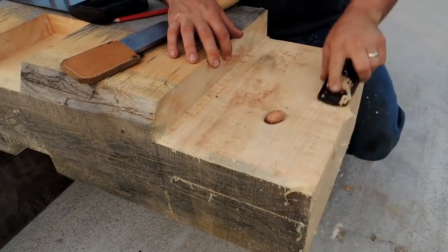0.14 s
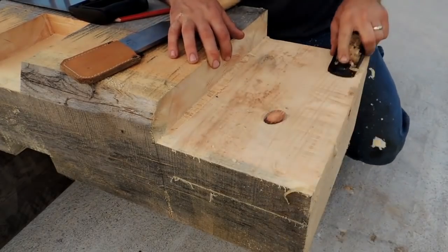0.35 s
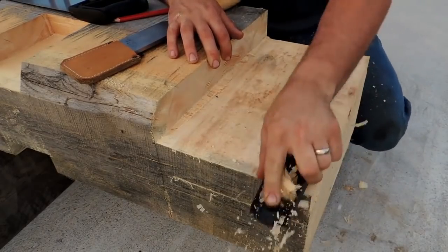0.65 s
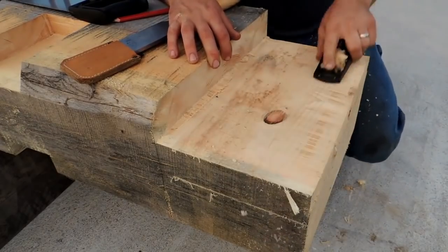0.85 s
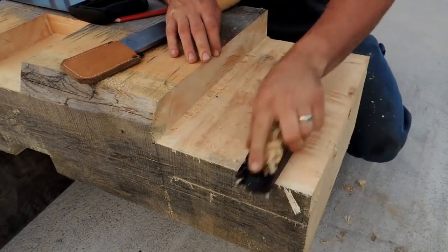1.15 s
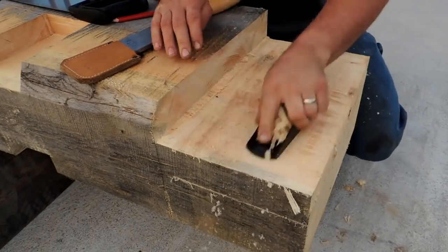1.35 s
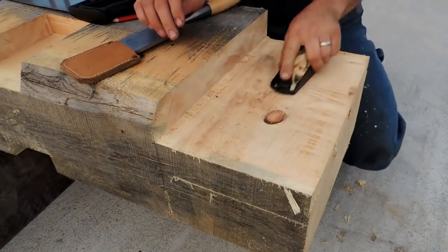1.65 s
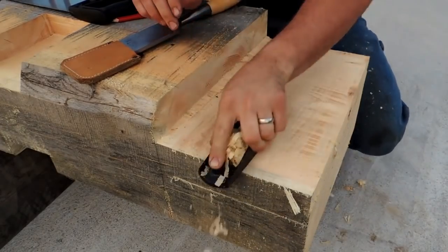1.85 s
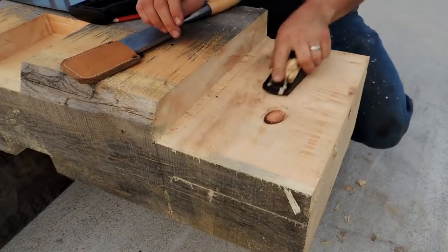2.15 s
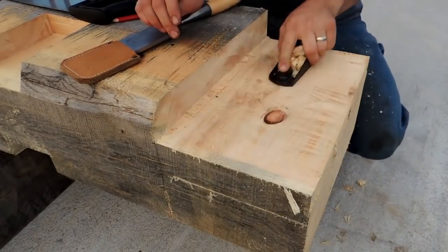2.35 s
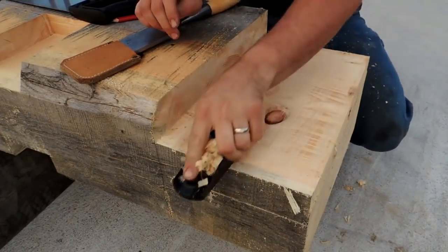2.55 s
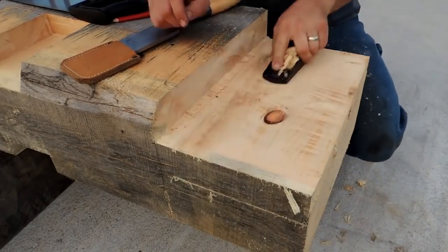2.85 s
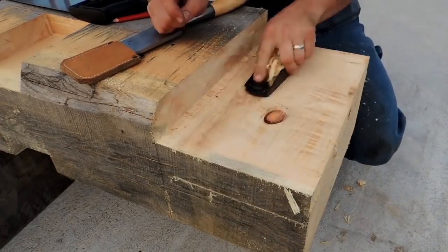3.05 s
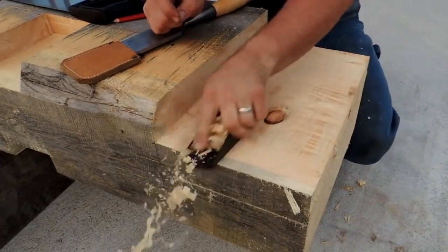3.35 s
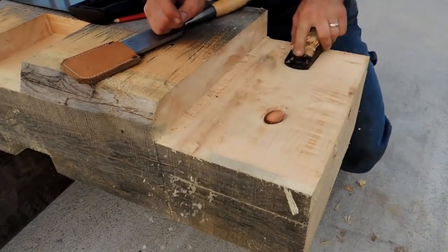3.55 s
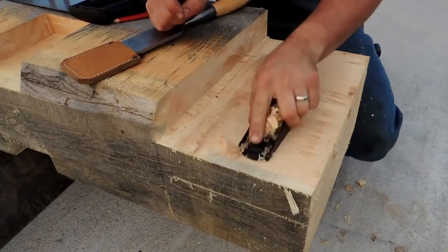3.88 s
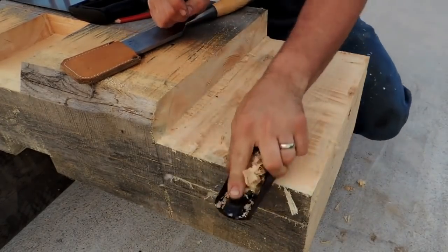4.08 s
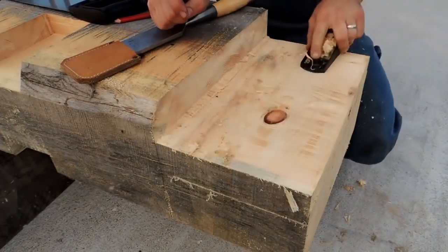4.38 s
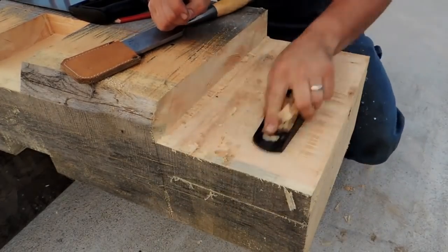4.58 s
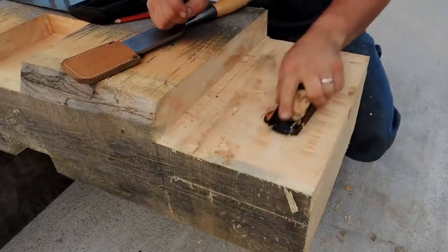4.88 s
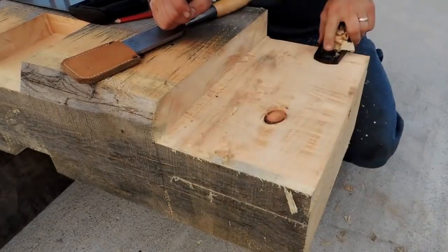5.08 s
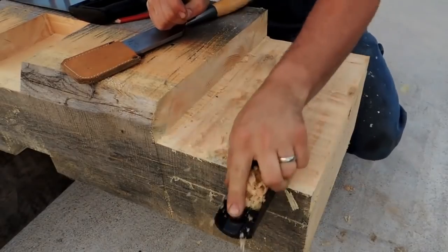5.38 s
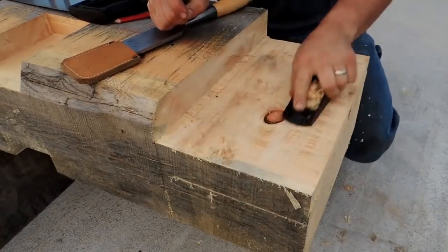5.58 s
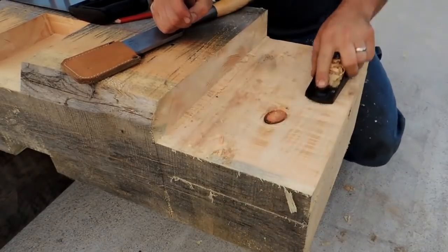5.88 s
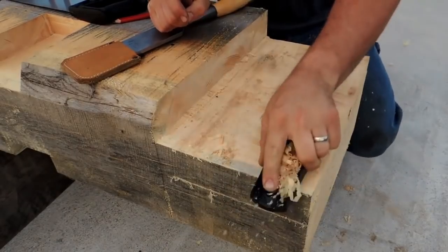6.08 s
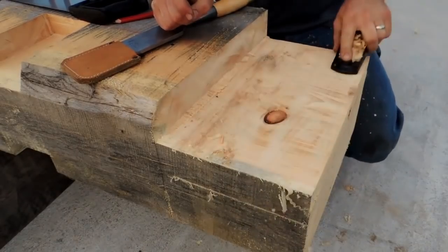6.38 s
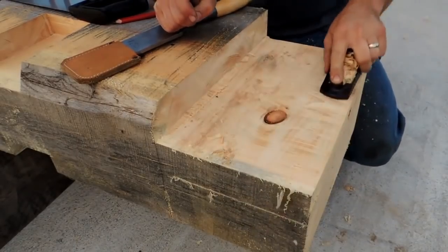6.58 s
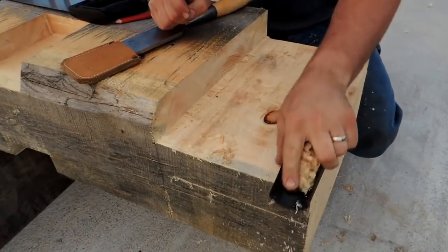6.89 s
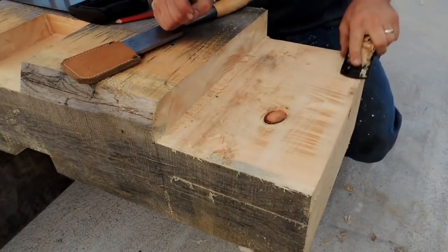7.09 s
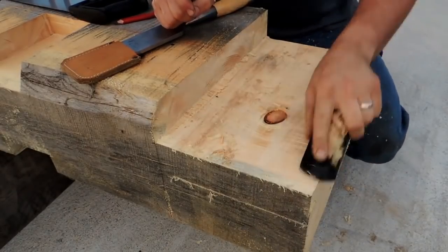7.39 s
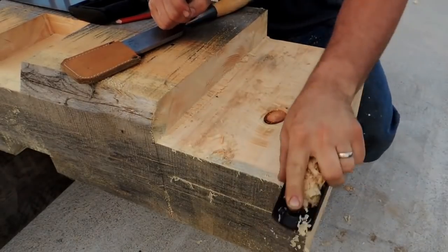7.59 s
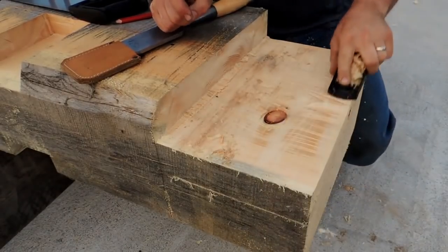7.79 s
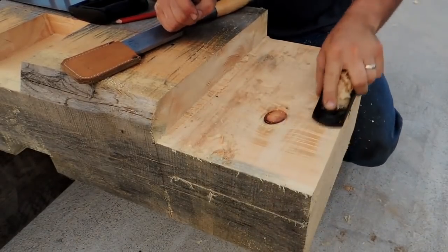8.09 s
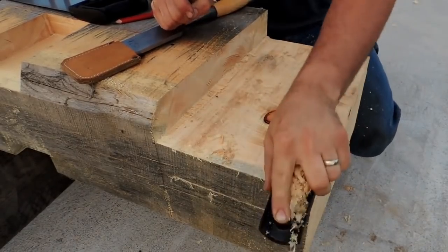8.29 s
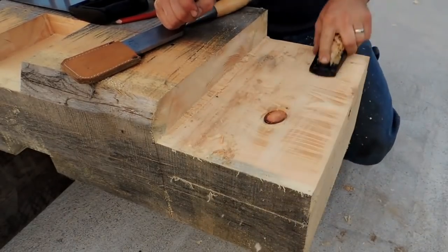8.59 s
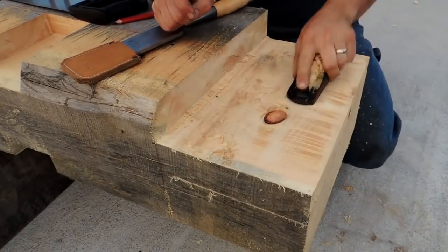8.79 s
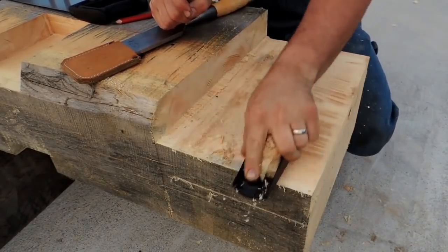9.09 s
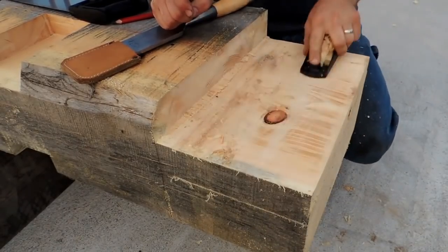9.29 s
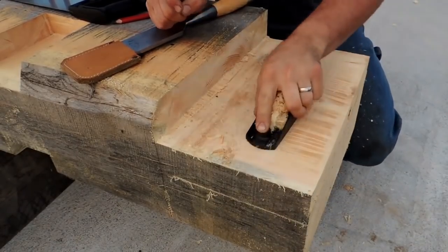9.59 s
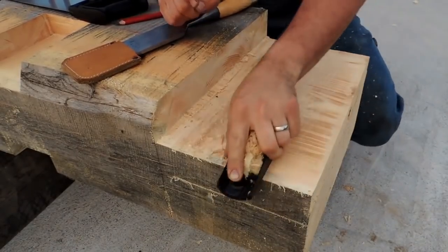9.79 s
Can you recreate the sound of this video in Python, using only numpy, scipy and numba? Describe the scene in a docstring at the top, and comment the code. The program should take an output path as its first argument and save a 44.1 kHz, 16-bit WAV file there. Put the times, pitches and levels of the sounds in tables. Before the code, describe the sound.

A block plane shaves a large timber for about ten seconds, heard close in a quiet yard with only a faint echo. It is pushed and dragged back roughly every 0.7 seconds. Pushes are dry, hollow rasps with hissing shavings, often ending in a short zip off the edge; returns are duller rubs. The strokes start firm, turn lighter from about 2 to 5 seconds, then grow stronger, with a sharp scrape at 6.5 and firm strokes until 9, before a softer last push. The timber rocks with low thumps near 1.5, 2.2 and 3.1 seconds, in a cluster from 4.5 to 5.1, and again from 7.6 to 8.4. The plane lands with dull knocks around 3.5, 5.8 and 8.7 seconds. Small chip clicks and snags are scattered throughout, with tiny high squeaks near 1.9, 4 and 9.7 seconds.

```python
"""Planing a timber outdoors

A block plane shaves the end of a big timber, pushed and dragged back in quick strokes. Friction and
tearing fibres excite the resonances of the wood and of the hollow under the hand. The sole zips over
the end edge, the timber rocks on its support with low thumps, and the yard answers faintly."""
import sys
import numpy as np
from scipy import signal
from scipy.fft import rfft, irfft, next_fast_len
from scipy.io import wavfile
from scipy.ndimage import uniform_filter1d, map_coordinates
from numba import njit

SR = 44100
rng = np.random.default_rng(int(sys.argv[2]) if len(sys.argv) > 2 else 0)


def unload_audio(sound):
    """Save the sound as a 16-bit wav file, at the path given as the first command line argument."""
    columns = np.transpose(np.atleast_2d(sound))
    # keep every value between -1 and 1, then stretch to whole-number steps
    steps = np.round(np.clip(columns, -1, 1) * 32767)
    wavfile.write(sys.argv[1], SR, steps.astype(np.int16))


N = 438354

# Forward and return strokes; in every table, levels are relative within a layer:
# (start [s], end [s], run-up [s], slow-down [s], scrape [dB], pressure gained over the stroke [dB],
# hollow [dB], hiss [dB], bias towards tearing [dB], hollow pitch [Hz], edge zip [dB])
PUSH_STROKES = [(-0.1, 0.129, 0.057, 0.008, -28.5, -3.5, -29.5, -42, 2, 657, -46.5),
                (0.466, 0.746, 0.055, 0.0034, -28.5, 2.5, -32.5, -42.5, -0.5, 698, -19),
                (1.128, 1.372, 0.054, 0.002, -34, -17.5, -34.5, -41.5, 2.5, 700, -22.5),
                (1.764, 2.052, 0.031, 0.021, -44, 2.5, -46.5, -55.0, 4, 716, -47.5),
                (2.465, 2.73, 0.033, 0.01, -42.5, 11, -43, -52.5, 1.5, 550, -48),
                (3.146, 3.372, 0.063, 0.0074, -38, 4.5, -36.5, -50.5, -19, 590, -44.5),
                (3.799, 4.198, 0.056, 0.011, -42, 2.0, -41.5, -50.5, 2.5, 630, -28),
                (4.601, 4.852, 0.038, 0.0026, -45.5, -7.5, -42, -51.5, 2.5, 562, -22.5),
                (5.277, 5.536, 0.054, 0.0043, -34, -8.5, -34.5, -43, 2, 656, -22.5),
                (5.954, 6.257, 0.063, 0.023, -31, -5, -33.5, -37, -4, 640, -33.5),
                (6.647, 6.958, 0.12, 0.019, -24.5, -13.5, -29.5, -37, -0.5, 677, -31.5),
                (7.384, 7.639, 0.035, 0.0022, -28.5, -8, -29.5, -45.5, 1, 554, -25.5),
                (8.119, 8.409, 0.084, 0.0088, -22.5, -13, -26, -36.5, -5.5, 590.0, -27.0),
                (8.859, 9.14, 0.032, 0.01, -31.5, -1.0, -31.5, -43.5, 4.5, 540, -22.5),
                (9.559, 9.962, 0.073, 0.006, -44, -4.5, -47, -57.5, 3, 552, -55.0)]
DRAG_STROKES = [(0.19, 0.431, 0.088, 0.08, -30, 4.0, -29.5, -39.5, -7.5, 560, -49.5),
                (0.858, 1.112, 0.004, 0.077, -29.5, -1, -28, -48.5, -0.5, 527, -29.5),
                (1.484, 1.703, 0.092, 0.037, -35, -9.5, -36.5, -49, 0.5, 488, -37.5),
                (2.192, 2.421, 0.082, 0.065, -41, 7, -39.5, -49.5, -9, 456, -60),
                (2.857, 3.111, 0.025, 0.11, -45.5, -9, -45.5, -59, -21, 457, -41.0),
                (3.522, 3.766, 0.0027, 0.061, -46, 1.5, -47.5, -63.5, -25, 448, -60),
                (4.327, 4.597, 0.014, 0.049, -52.5, 8.5, -48.5, -62, 0, 525, -38),
                (4.988, 5.254, 0.01, 0.057, -39, 9, -37, -51.5, 4, 495, -41.5),
                (5.666, 5.934, 0.014, 0.071, -33.5, 10.0, -36, -49, -5, 538, -33),
                (6.332, 6.643, 0.002, 0.027, -47.5, 22, -40, -60, 1, 545, -54),
                (7.07, 7.329, 0.073, 0.074, -32.5, 7, -32.5, -49, -1.5, 482, -43.5),
                (7.797, 8.089, 0.032, 0.038, -30, 0.5, -28, -50, -2, 467, -30.5),
                (8.553, 8.835, 0.078, 0.091, -28.5, -6.0, -30.5, -44, 1, 490.0, -35.5),
                (9.274, 9.526, 0.0022, 0.074, -37, 3.5, -32.5, -52, 5.5, 495, -28)]
# Modes of plane and timber: (frequency [Hz], bandwidth [Hz], level pushed [dB], level dragged [dB])
BODY_MODES = [(837, 32, -9, -1.5), (1170, 42, 4, -7.5), (1462, 41, 3.5, -10), (1640, 71, -18.5, -4.5),
              (1846, 41, -6, 2.5), (2204, 78, -7, 0), (2870, 190, -7.5, -1.5), (3795, 53, -12.5, 1),
              (4020, 37, -7, -7.5)]


def amp(db):
    """Amplitude ratio of a level in decibels."""
    return 10 ** (np.asarray(db) / 20)


def unit(x):
    """Normalisation to rms 1."""
    return x / np.sqrt(np.mean(x ** 2) + 1e-20)


def steady(x):
    """Division by the running rms, which flattens the slow envelope."""
    return x / np.sqrt(np.abs(uniform_filter1d(x ** 2, size=1800)) + 1e-9)


def along(points, hz):
    """Interpolation of (frequency [Hz], value) points on a logarithmic frequency axis."""
    knots_hz, values = np.transpose(points)
    return np.interp(np.log(hz + 1), np.log(knots_hz), values)


def wobble(rate):
    """Slow random modulation: a spline through `rate` Gaussian knots a second."""
    return map_coordinates(rng.standard_normal(int(N * rate / SR) + 4), [np.arange(N) * rate / SR])


def swells(rows):
    """Sum of asymmetric Gaussian pulses, given as (time [s], rise [s], fall [s], height)."""
    t = np.arange(N) / SR
    total = np.zeros(N)
    for s, rise, fall, height in rows:
        near = np.abs(t - s) < 1
        lag = t[near] - s
        total[near] += height * np.exp(-(lag / np.where(lag < 0, rise, fall)) ** 2)
    return total


def filtered(x, response):
    """Zero-phase filtering: the spectrum is multiplied by a frequency response."""
    size = next_fast_len(len(x) + SR // 4)
    return irfft(rfft(x, size) * response(np.fft.rfftfreq(size, 1 / SR)), size)[:len(x)]


def coloured(x, spectrum):
    """Spectral shaping by (frequency [Hz], level [dB]) points, at rms 1."""
    return unit(filtered(x, lambda hz: amp(along(spectrum, hz))))


def add(track, s, sound):
    """Superposition of a sound on the track from time s."""
    part = track[max(round(s * SR), 0):][:len(sound)]
    part += sound[:len(part)]


@njit
def resonate(x, step, damping):
    """A driven, damped oscillator of varying frequency; step is about its radians per sample."""
    out, low, band = np.zeros(len(x)), 0., 0.
    for i in range(len(x)):
        band += step[i] * (x[i] - low - damping[i] * band)
        low += step[i] * band
        out[i] = band
    return out


def outdoor_air():
    """Stationary broadband noise: the faint background of still air."""
    spectrum = [(20, -18), (55, -3), (120, -32.5), (220, -22), (400, -20.5), (1200, -12.5), (3000, -18),
                (8000, -16), (15000, -34)]  # ambient noise: (frequency [Hz], level [dB])
    return amp(-71) * coloured(rng.standard_normal(N), spectrum)


def yard(x, wall_s, late_db):
    """Reverberation: scattered echoes decay exponentially, raised by late_db after the wall's delay."""
    decay_times = [(150, 0.6), (900, 0.26), (5000, 0.3), (15000, 0.44)]  # reverberation of the yard: (frequency [Hz], T60 [s])
    hz, t, noise = signal.stft(rng.standard_normal(SR // 2), SR, nperseg=256)
    fade_db = -60 * t / along(decay_times, hz)[:, None] + late_db * (t > wall_s)
    tail = signal.istft(noise * amp(fade_db), SR, nperseg=256)[1]
    return signal.fftconvolve(x, tail / np.linalg.norm(tail))[:N]


def blows(events, spectrum, t60, attack_s, gain_db):
    """Heavily damped impacts on thick wood; a softer contact has a slower attack."""
    track, t = np.zeros(N), np.arange(SR // 5) / SR
    envelope = amp(-60 * t / t60) * (1 - np.exp(-(t / attack_s) ** 2))
    for s, db in events:
        knock = coloured(rng.standard_normal(len(t)), spectrum) * envelope
        add(track, s, amp(db + gain_db) * knock / np.abs(knock).max())
    return track


def rocking():
    """Free vibration: the timber drops on its support and booms; shifting weight makes it rumble."""
    drops = [(1.46, -12.5, -8), (2.236, -16, -11), (3.096, -21, -15.5), (3.118, -16.5, -13.5),
             (4.533, -11.5, -17), (4.778, -10.5, -22), (4.927, -7.5, -24), (4.947, -8, -18),
             (5.139, -12, -15), (7.633, -18, -11.5), (7.65, -7, -27), (7.848, -13.5, -13),
             (8.395, -13.5, -22.5), (8.672, -36, -2), (9.477, -25, -28)]  # falls onto the support: (time [s], level [dB], thud offset [dB])
    low_modes = [(58.4, 21, 12), (92, 40, -5)]  # the timber's modes: (frequency [Hz], bandwidth [Hz], level [dB])
    thud_spectrum = [(60, 8.5), (150, 8.5), (350, -3.5), (700, -18.5), (1500, -38), (5000, -52)]  # contact with the support: (frequency [Hz], level [dB])
    shifts = [(1.38, 0.14, -49), (3.27, 0.13, -48), (4.07, 0.22, -54), (4.836, 0.35, -44),
              (5.602, 0.097, -42.5), (6.147, 0.17, -41.5), (7.823, 0.19, -39), (8.43, 0.27, -40),
              (8.96, 0.29, -48.5), (9.62, 0.32, -54)]  # the worker's weight shifts: (time [s], half length [s], level [dB])
    boom, t = np.zeros(N), np.arange(SR // 3) / SR
    ring = sum(amp(db) * np.sin(2 * np.pi * hz * t) * np.exp(-np.pi * width * t)
               for hz, width, db in low_modes)
    ring *= 1 - np.exp(-t / 0.0036)
    for s, db, _ in drops:
        add(boom, s, amp(db - 3.0) * ring / np.abs(ring).max())
    contacts = [(s, db + offset_db) for s, db, offset_db in drops]
    thuds = blows(contacts, thud_spectrum, t60=0.069, attack_s=0.0028, gain_db=7)
    sway = amp(-70) + swells([(s, half, half, amp(db)) for s, half, db in shifts])
    rumble_spectrum = [(20, -25.0), (52, 1.0), (100, -9.0), (180, -18), (400, -27), (1500, -96)]
    rumble = coloured(rng.standard_normal(N), rumble_spectrum)
    return boom + thuds + sway * amp(4.3 * wobble(14)) * rumble


def knocks():
    """Impact: the plane is set down on the wood with a dead knock."""
    contacts = [(0.793, -39), (1.426, -31), (3.459, -15.5), (3.477, -24), (3.488, -19), (3.505, -27),
                (4.916, -32), (5.82, -23), (8.717, -16.5)]  # plane meets wood: (time [s], level [dB])
    spectrum = [(60, -22), (200, 11), (420, 12), (750, 8), (1400, -10.5), (2500, -41), (9000, -43)]  # dull knock: (frequency [Hz], level [dB])
    return blows(contacts, spectrum, t60=0.044, attack_s=0.00082, gain_db=-1.5)


def chips():
    """Brittle fracture: chips crack off with short, bright clicks."""
    cracks = [(1.559, -21.5), (3.284, -23), (4.396, -27), (5.14, -19), (5.99, -26.5), (7.067, -35),
              (9.023, -27)]  # chips breaking: (time [s], level [dB])
    spectrum = [(200, -10), (1500, 1), (4000, -4), (15000, -21)]  # click: (frequency [Hz], level [dB])
    return blows(cracks, spectrum, t60=0.029, attack_s=0.00032, gain_db=-3.5)


def fibres(rate, spread_db, share):
    """Shot noise: `rate` fibres snap a second and carry `share` of the power; friction has the rest."""
    snaps = (rng.random(N) < rate / SR) * rng.standard_normal(N)
    snaps *= amp(spread_db * rng.standard_normal(N))
    return np.sqrt(share) * unit(snaps) + np.sqrt(1 - share) * rng.standard_normal(N)


def rasps(events, spectrum, gain_db):
    """Bursts of shot noise: dense snaps swell fast and fade exponentially."""
    envelope, t = np.zeros(N), np.arange(SR // 5) / SR
    for s, db, length in events:
        age = 3 * t / length
        add(envelope, s - .003, amp(db + gain_db) * age * np.exp(1 - age))
    return envelope * coloured(fibres(rate=1900, spread_db=4.5, share=0.42), spectrum)


def catches():
    """Uneven friction: the iron snags, a shaving squeaks in the mouth, the sole judders on the grain."""
    # Bursts of each kind: (time [s], level [dB], length [s])
    snags = [(.597, -12.5, .014), (.998, -22, 0.023), (1.93, -32.5, 0.012), (3.531, -33, 0.016),
             (3.951, -23, 0.026), (3.985, -14, 0.021), (6.498, -20.5, 0.017), (7.102, -23.5, 0.018),
             (8.148, -20, 0.014), (9.645, -27, 0.017)]
    squeaks = [(1.886, -13, 0.022), (3.963, -19.5, 0.017), (9.718, -23, 0.032)]
    judders = [(.46, -27.5, .04), (.95, -23.5, 0.085), (1.56, -28.5, 0.083), (3.73, -34, 0.047),
               (5.74, -33, 0.092), (6.6, -22.5, 0.043), (7.007, -26.5, 0.029), (7.13, -23.5, 0.073),
               (7.93, -23.5, 0.11), (8.59, -28, 0.13)]
    # Their spectra: (frequency [Hz], level [dB])
    tear_spectrum = [(600, -22), (1400, 4), (2300, 6), (3900, -6), (4900, -21), (8000, -23.5), (15000, -30)]
    squeak_spectrum = [(4000, -41), (6500, -25), (7400, -3), (9100, -2), (10300, -6), (12500, -20),
                       (15500, -10.5)]
    judder_spectrum = [(80, -24), (180, -1.5), (330, 6), (700, -39)]
    return (rasps(snags, tear_spectrum, gain_db=-9)
            + rasps(squeaks, squeak_spectrum, gain_db=-11.5)
            + rasps(judders, judder_spectrum, gain_db=-13))


def zips():
    """Edge friction: the sole zips off the timber's end after a push and lands on it to start a drag."""
    # Sole crossing the edge, and landing on it: (frequency [Hz], level [dB])
    zip_spectrum = [(2500, -21.5), (4200, -19), (5000, 1.5), (6200, -4.5), (7500, -6.5), (10000, -38),
                    (16000, -20)]
    landing_spectrum = [(250, -21), (520, -3.5), (900, 2.5), (1300, -7.5), (2400, -12.5), (4000, -32),
                        (9000, -38)]
    lead_s, rise_s, fall_s, crossing_s = 0.016, 0.012, 0.0071, 0.03
    leaving = swells([(end - lead_s, rise_s, fall_s, amp(db - 8.5)) for _, end, *_, db in PUSH_STROKES])
    returning = [(start, db, crossing_s) for start, *_, db in DRAG_STROKES]
    return (leaving * coloured(fibres(rate=2200, spread_db=4.5, share=0.38), zip_spectrum)
            + rasps(returning, zip_spectrum, gain_db=-8.0)
            + rasps(returning, landing_spectrum, gain_db=-3.5))


def patchy(x, depth_db):
    """Position-dependent coupling: random peaks and notches pass as the plane crosses the wood's nodes."""
    frames = signal.stft(x, nperseg=1024)[2]
    patch = np.outer(np.hanning(5), np.hanning(16))
    field = signal.fftconvolve(rng.standard_normal(frames.shape), patch, mode="same")
    return unit(signal.istft(frames * amp(depth_db * unit(field)), nperseg=1024)[1][:N])


def ringing(drive, modes, wander_db, drift):
    """Forced vibration: each mode wanders in level and pitch, as with changing place and grip."""
    total = np.zeros(N)
    for hz, width, db in modes:
        pitch = hz * np.exp(drift * wobble(7.6))
        ring = resonate(drive, 2 * np.sin(np.pi * pitch / SR), width / pitch) * width / pitch
        total += amp(db + wander_db * wobble(12)) * ring
    return total


def hollow(pitch_hz, width_hz, broad_db, highpass_hz):
    """Cavity resonance: the timber's low voice peaks in the hollow between hand and wood."""
    spectrum = [(60, -42), (160, -13), (290, -8), (400, -1), (540, 1.5), (740, -5), (870, -1.5),
                (1100, -8.5), (1500, -31), (3000, -44.5)]  # the timber's low voice: (frequency [Hz], level [dB])
    pitch = np.clip(pitch_hz, 200, 2000)
    drive = patchy(coloured(fibres(rate=900, spread_db=0.0, share=0.31), spectrum), depth_db=4.5)
    voice = unit(resonate(drive, 2 * np.pi * pitch / SR, width_hz / pitch)) + amp(broad_db) * drive
    return steady(signal.lfilter(*signal.butter(3, highpass_hz, "highpass", fs=SR), voice))


def scrape(spectrum, modes, level_db, bite, ring_db):
    """Friction noise drives the modes: a light touch glides dully, a deep bite (0-1) tears brightly."""
    glide_spectrum = [(700, -38), (1000, -8), (1350, 7), (1600, 3), (1900, 5), (2300, 3), (2700, -3.5),
                      (3100, -13.5), (3450, -16), (4150, -14), (4600, -31), (6000, -39.5), (8000, -28)]  # light sliding: (frequency [Hz], level [dB])
    tearing = coloured(fibres(rate=900, spread_db=-1.5, share=0.33), spectrum)
    gliding = coloured(fibres(rate=2500, spread_db=3.5, share=0.46), glide_spectrum)
    broad = patchy(np.sqrt(bite) * tearing + np.sqrt(1 - bite) * gliding, depth_db=4.0)
    return amp(level_db) * steady(broad + amp(ring_db) * ringing(broad, modes, wander_db=4.0, drift=.033))


def motion(strokes, land_s, lift_s, hollow_law, hiss_law, bend_oct, glide_oct):
    """Friction noise grows with pressure and as a power of the sliding speed.
    A law is (exponent of speed, mid-stroke arch [dB], trend from start to end [dB])."""
    # The plane bites harder: (time [s], rise [s], fall [s], scrape [dB], hollow [dB], hiss [dB])
    surges = [(0.228, 0.018, 0.071, 6.5, 7, -4.5), (0.347, 0.018, 0.072, 11.5, 7.0, 10.0),
              (0.552, 0.029, 0.057, 4, 0.5, 4.5), (1.003, 0.017, 0.044, 8, 9, 12),
              (1.241, 0.06, 0.05, 3, -4, 6), (1.354, 0.029, 0.018, 15, 5.5, -1.5),
              (1.56, 0.0021, 0.013, 1.5, 10.5, 10.5), (1.926, 0.058, 0.043, 12.5, 9.5, 6),
              (2.254, 0.011, 0.043, 2.5, 0.5, 7.5), (2.66, 0.042, 0.11, 10, 4.5, 2.5),
              (2.907, 0.028, 0.046, 9, 8, 8), (3.266, 0.032, 0.02, 4, -4, 6),
              (3.339, 0.037, 0.028, 9, -5, -10), (3.552, 0.03, 0.014, 13.5, 11.5, 7),
              (3.976, 0.028, 0.014, 16, 6, 17), (4.159, 0.038, 0.019, 2.5, 8.5, -2.5),
              (4.391, 0.034, 0.015, 13.5, 14.5, 19), (4.701, 0.031, 0.02, 10, 3, 4.5),
              (4.83, 0.046, 0.031, 18.5, 10, 5.5), (5.135, 0.036, 0.045, 2.5, 2.5, 7),
              (5.411, 0.028, 0.034, 1.0, -8, 5.0), (5.517, 0.024, 0.038, 8.0, 1, -3.5),
              (5.753, 0.031, 0.046, -1.5, 10.5, -1), (5.825, 0.02, 0.052, 4, 10, 4.5),
              (5.998, 0.018, 0.037, 4.0, 2.5, -1), (6.199, 0.048, 0.037, 6, 6.5, -4),
              (6.416, 0.011, 0.0084, 9.5, 12.5, 9.5), (6.512, 0.022, 0.055, 24, 13, 23.5),
              (6.765, 0.059, 0.037, 2, 2.5, 12), (7.142, 0.033, 0.034, -6.5, 12, -3.5),
              (7.229, 0.04, 0.029, 6.0, 10, 2.5), (7.452, 0.018, 0.042, 1.5, 2, 5),
              (7.971, 0.012, 0.013, 4.5, 6, 3), (8.192, 0.018, 0.0072, 2.5, 5.5, 7.5),
              (8.601, 0.033, 0.017, -0.5, 7, 5), (8.721, 0.012, 0.035, 3, 10, 5.5),
              (9.663, 0.02, 0.094, 11.0, 14, 13)]
    creep = 0.044  # about the share of full speed left at either end of a stroke
    t = np.arange(N) / SR
    rows = np.array(strokes)
    current = np.maximum(np.searchsorted(rows[:, 0] - land_s, t) - 1, 0)
    start, end, run_up, slow_down = rows[current, :4].T
    scrape_db, lean_db, hollow_db, hiss_db, tear_db, pitch_hz = rows[current, 4:10].T
    contact = np.clip((t - start) / land_s + .5, 0, 1) * np.clip((end - t) / lift_s + .5, 0, 1)
    position = np.clip((t - start) / (end - start), 0, 1) - .5
    middle = np.cos(np.pi * position)
    speed = np.tanh(np.abs((t - start) / run_up) + creep) * np.tanh(np.abs((end - t) / slow_down) + creep)

    def level(base_db, surge_column, exponent, arch_db, trend_db):
        surge_db = swells([(*row[:3], row[surge_column]) for row in surges])
        contour_db = (lean_db + trend_db) * position + arch_db * (middle - 2 / np.pi)
        return base_db + exponent * 20 * np.log10(speed) + contour_db + surge_db

    # The hollow's pitch bends up towards both ends of the stroke.
    octaves = bend_oct * (1 - middle) + glide_oct * position + 0.076 * wobble(25)
    return (contact, middle, tear_db, pitch_hz * 2 ** octaves,
            level(scrape_db, 3, exponent=1, arch_db=0, trend_db=0),
            level(hollow_db, 4, *hollow_law), level(hiss_db, 5, *hiss_law))


def drags():
    """Sliding friction: the sole rubs back, duller than the cut, brightest mid-stroke and pressed hard."""
    # Rubbing on the grain, and the sole's hiss: (frequency [Hz], level [dB])
    rub_spectrum = [(600, -27.5), (1000, -4.5), (1300, 1.5), (1900, -1), (2400, -3), (3000, -6.5),
                    (3600, -9), (4200, -13), (4800, -15), (5800, -23), (7000, -48), (10000, -55)]
    hiss_spectrum = [(4500, -20), (6300, -8.5), (7400, 0), (8200, -5.5), (9000, -3), (10300, -11.5),
                     (12500, -18), (15800, -14)]
    contact, middle, tear_db, pitch_hz, scrape_db, hollow_db, hiss_db = motion(
        DRAG_STROKES, land_s=0.004, lift_s=0.032, hollow_law=(0.6, -1.7, -5.2),
        hiss_law=(1.54, 4.5, -15.0), bend_oct=0.46, glide_oct=-0.48)
    bite = (1 + np.tanh((scrape_db + tear_db + 8 * middle + 28.5) / 7)) / 2
    modes = [(hz, width, db) for hz, width, _, db in BODY_MODES]
    rub = scrape(rub_spectrum, modes, scrape_db + 1.9, bite, ring_db=5)
    cavity = amp(hollow_db + 1.5) * hollow(pitch_hz, width_hz=236, broad_db=-10.0, highpass_hz=194)
    sole = coloured(fibres(rate=1900, spread_db=4.5, share=0.23), hiss_spectrum)
    hiss = amp(hiss_db + 1.5) * patchy(sole, depth_db=0.0)
    flicker = amp(-1.19 + 2.1 * wobble(60) + 0.76 * wobble(260))
    return contact * flicker * (rub + cavity + hiss)


def pushes():
    """Cutting by fracture: a thicker shaving tears more brightly and hisses louder out of the mouth."""
    # The iron's cut, and the shaving's hiss: (frequency [Hz], level [dB])
    cut_spectrum = [(600, -28.5), (950, -7), (1300, -6), (1600, -0.5), (2250, -5.5), (2700, -9),
                    (3300, -10.5), (4200, -12), (4800, -18), (6000, -22.5), (7000, -24), (10000, -54)]
    hiss_spectrum = [(3500, -16), (5500, -5), (7500, 3), (9200, 1.5), (10500, -7), (12500, -6.5),
                     (15800, -5)]
    contact, _, tear_db, pitch_hz, scrape_db, hollow_db, hiss_db = motion(
        PUSH_STROKES, land_s=0.012, lift_s=0.024, hollow_law=(0.59, -4.0, 10.0),
        hiss_law=(3.6, -4.5, 5), bend_oct=0.73, glide_oct=-.05)
    bite = (1 + np.tanh((hiss_db + tear_db + 44.5) / 7)) / 2
    modes = [(hz, width, db) for hz, width, db, _ in BODY_MODES]
    cut = scrape(cut_spectrum, modes, scrape_db + 0.94, bite, ring_db=-3.5)
    cavity = amp(hollow_db + 1.5) * hollow(pitch_hz, width_hz=380, broad_db=-7.5, highpass_hz=375)
    shaving = coloured(fibres(rate=1800, spread_db=2, share=0.25), hiss_spectrum)
    hiss = amp(hiss_db + 0.9) * patchy(shaving, depth_db=5.5)
    flicker = amp(-0.6 + 1.5 * wobble(60) + 1.3 * wobble(320))
    return contact * flicker * (cut + cavity + hiss)


def scene():
    """Superposition of the direct sound of the work, its echoes and the outdoor air, in one channel."""
    work = zips() + catches() + knocks() + chips() + pushes() + drags() + rocking()
    air = outdoor_air()
    echoes = amp(-18.0) * yard(work, wall_s=0.064, late_db=1)
    return (work + echoes + air)[None]


def record(dry):
    """Band limiting: the microphone drops the deepest bass and the highest treble."""
    low_hz, top_hz, edge_hz = 27, 15800, 300
    lean = signal.lfilter(*signal.butter(2, low_hz, "highpass", fs=SR), dry)
    return np.array([filtered(channel, lambda hz: np.clip((top_hz - hz) / edge_hz + .5, 0, 1))
                     for channel in lean])


dry = scene()
out = record(dry)
unload_audio(out)
```